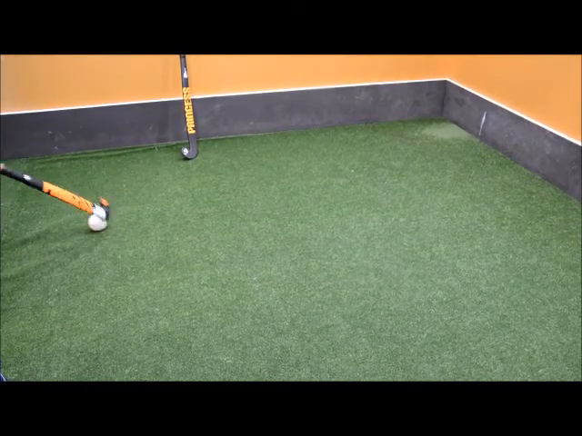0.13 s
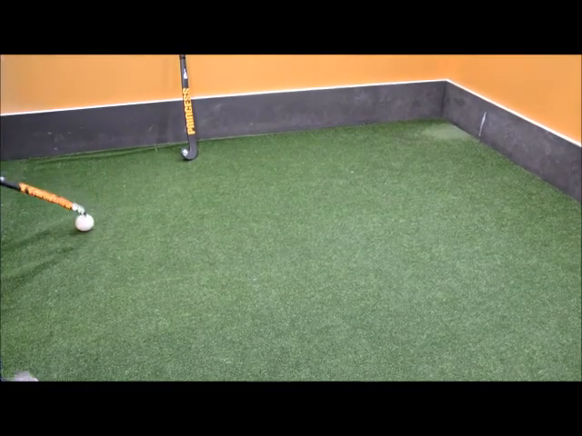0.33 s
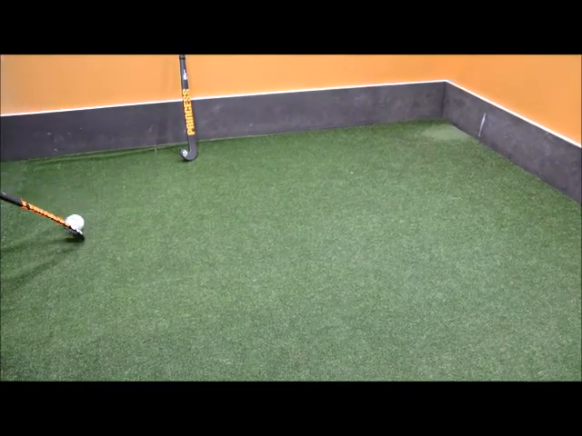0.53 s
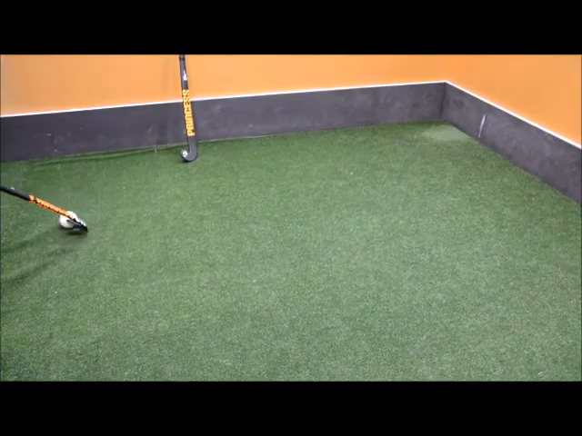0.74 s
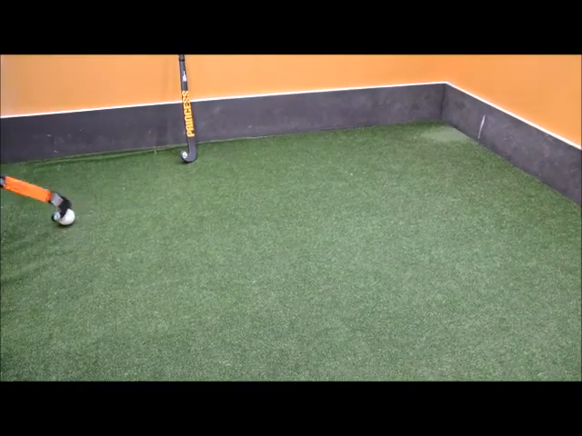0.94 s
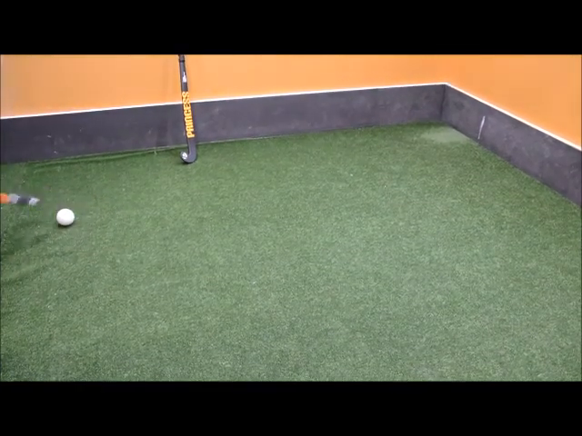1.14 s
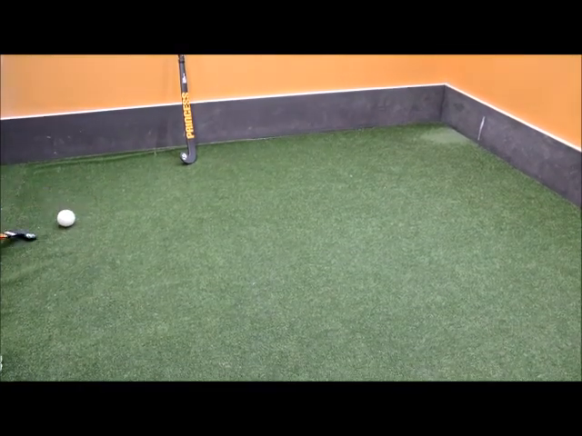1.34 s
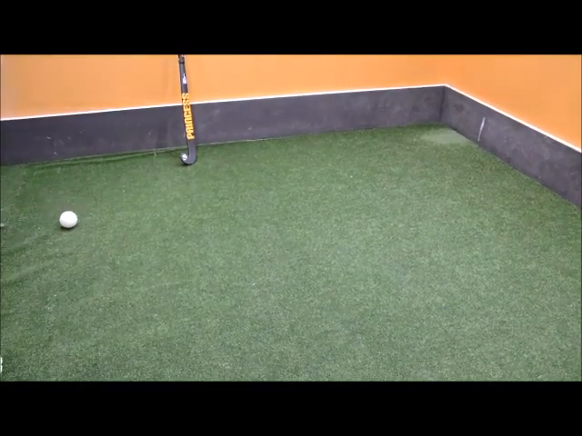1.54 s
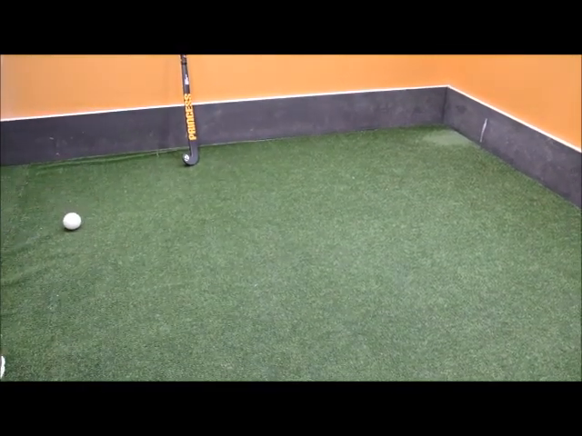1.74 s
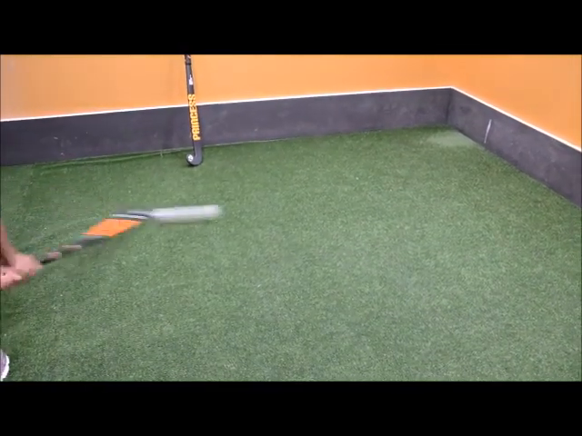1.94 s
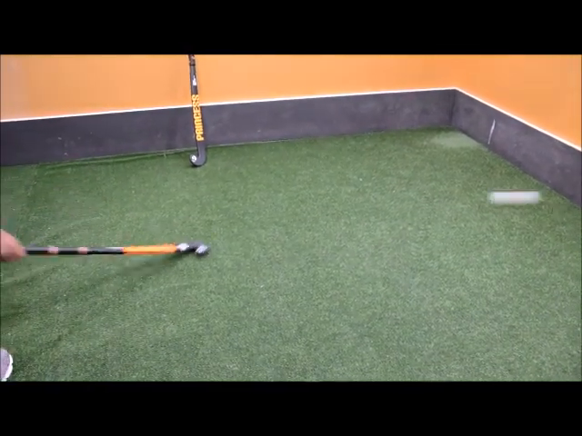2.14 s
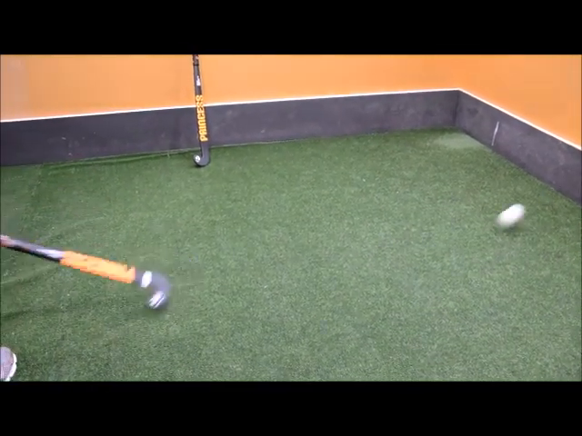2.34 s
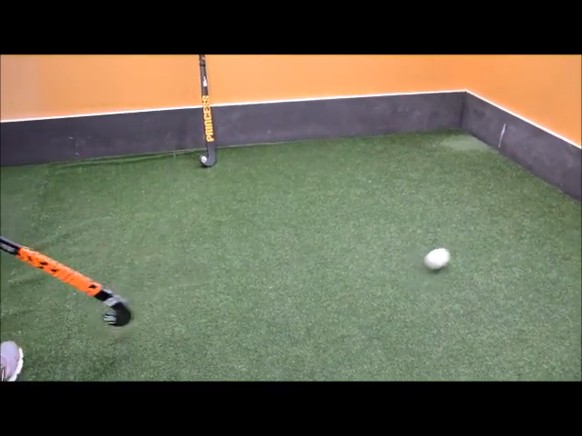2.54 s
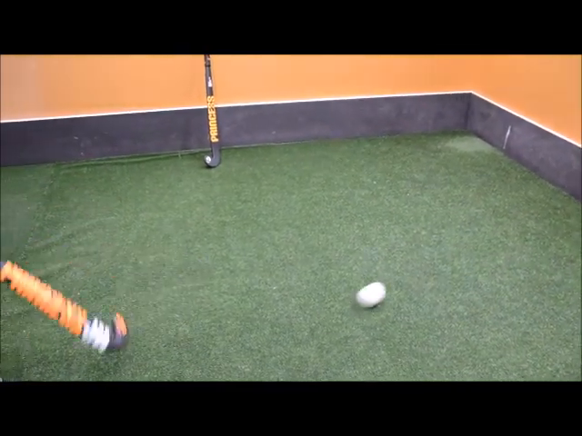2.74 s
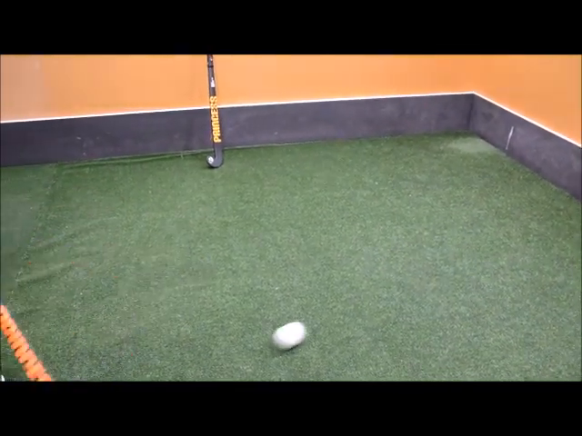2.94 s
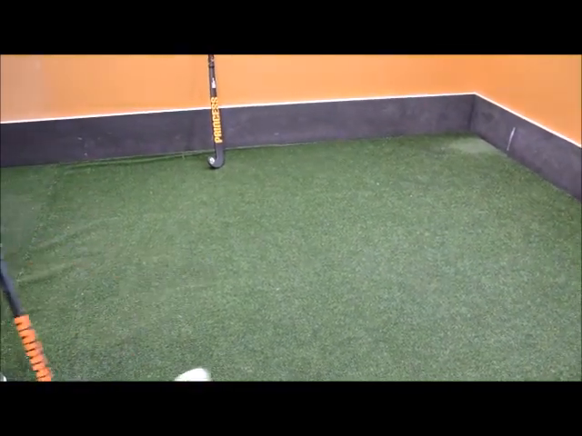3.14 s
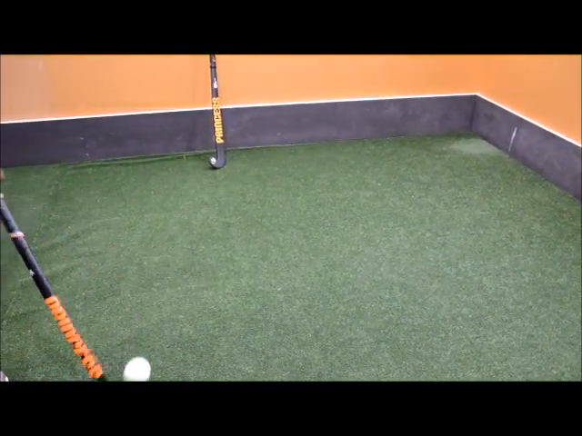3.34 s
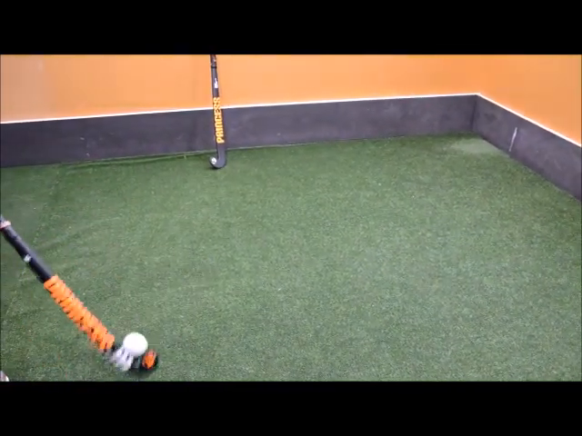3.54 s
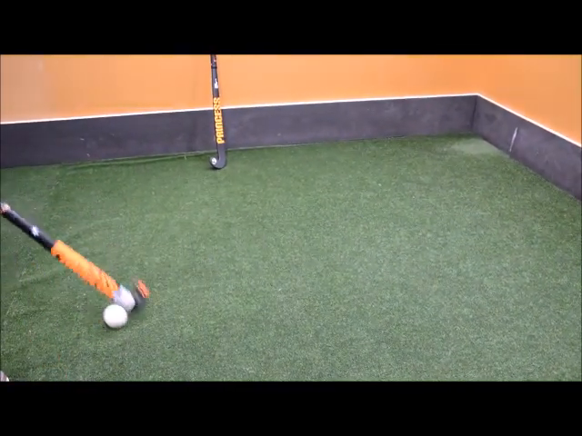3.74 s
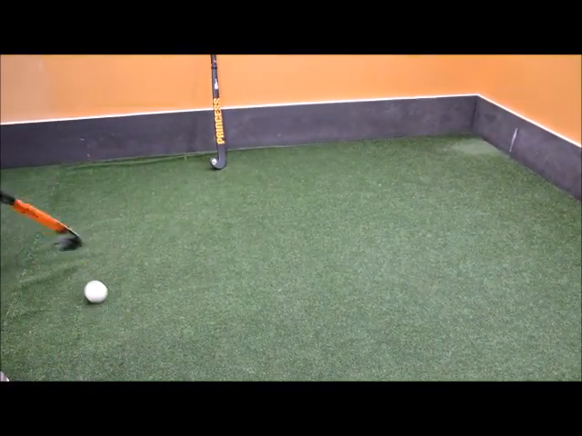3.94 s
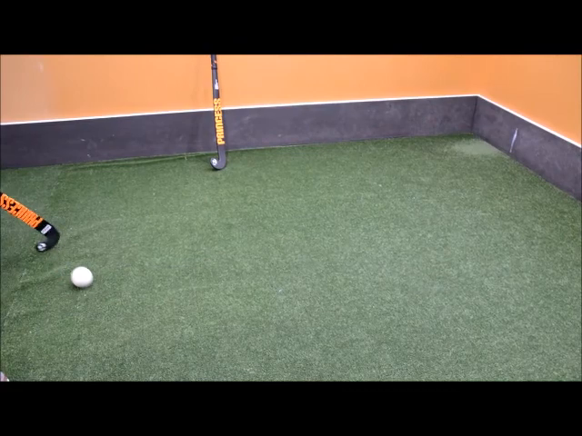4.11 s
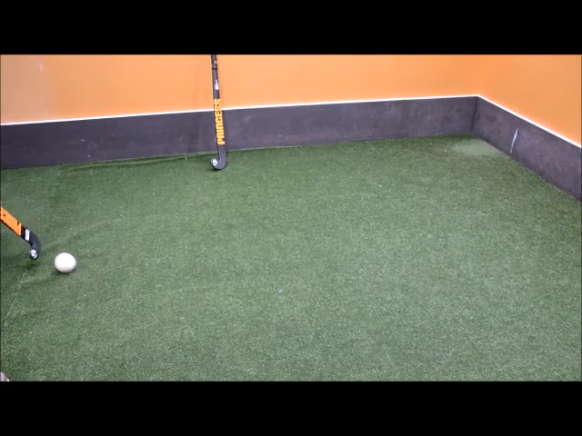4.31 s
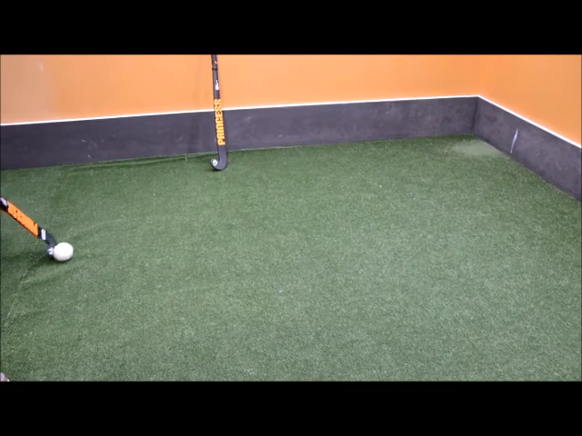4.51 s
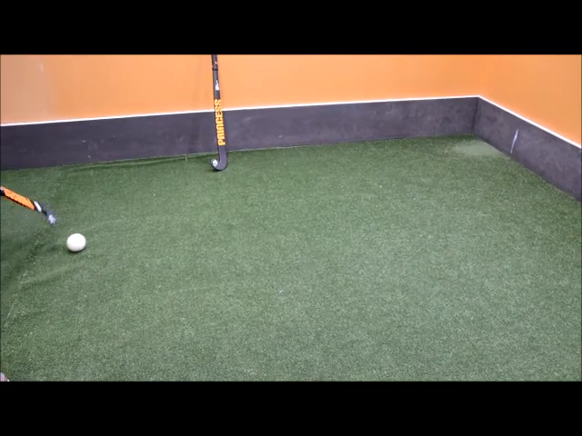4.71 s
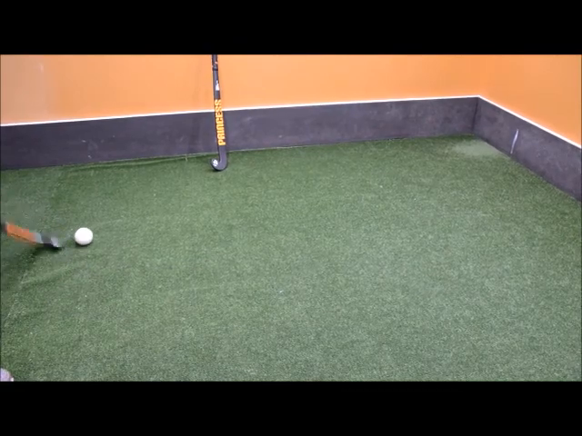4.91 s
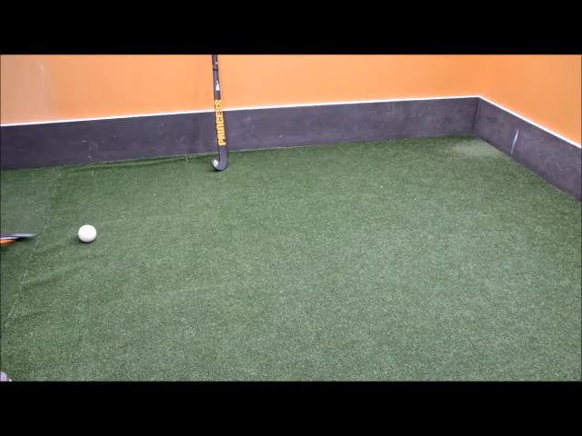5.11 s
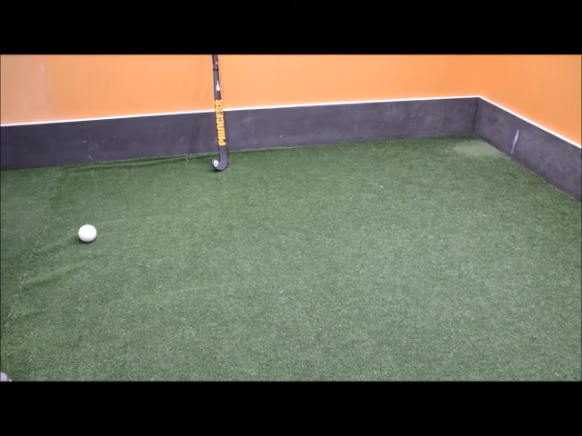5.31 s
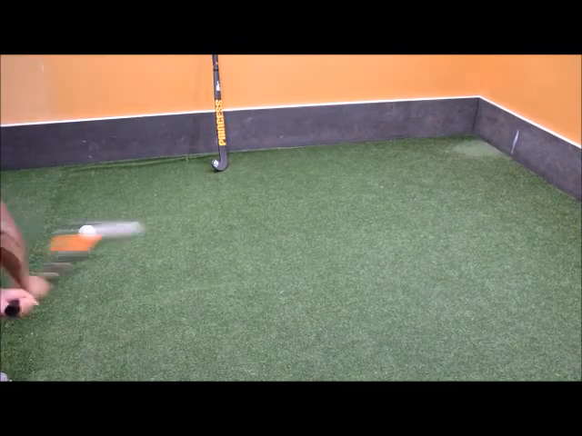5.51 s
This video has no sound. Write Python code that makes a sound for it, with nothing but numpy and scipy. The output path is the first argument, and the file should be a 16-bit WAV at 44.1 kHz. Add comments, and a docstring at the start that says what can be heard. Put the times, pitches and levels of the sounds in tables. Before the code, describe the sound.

A small, hard-walled indoor hall with a faint steady hum and a lively, short reverb. Very faint stick taps on a hard ball or turf come at 0.0 and 0.6 s, amid soft grainy brushing of plastic grass. A moderate, damped knock with a dull thud lands at 1.25 s, followed by light scuffing. At 1.9 s a strong, dry wooden crack sends the ball off; at 2.2 s it slaps a wooden side board, the loudest event, with a bright smack, short rattle and low boom that flatten the microphone input. Soft low footfalls or bounces follow at 2.5 and 2.7 s. At 3.25 s a hard, ringing double knock; a clicky lighter pair at 3.6 s. Faint taps come at 4.4, 4.7 and 4.9 s, with turf swishes until about 5.3 s. A final sharp, bright crack at 5.5 s echoes as it ends.

```python
"""A hockey stick and a hard ball on artificial turf in a small hard-walled hall, over a faint hum.
Faint to moderate stick taps lead to a strong knock at 1.9 s; each sums dying modes, a noisy clack and a tick.
At 2.2 s the shot slaps a wooden side board, which rattles and booms and overloads the input stage.
Hard knocks follow at 3.2 and 5.5 s, weaker ones between; grainy noise brushes the turf around them,
with low sine thuds and footfalls. Echoes and decaying random taps make the hall."""
import sys
import numpy as np
from scipy import signal
from scipy.fft import rfft, irfft
from scipy.io import wavfile
from scipy.ndimage import uniform_filter1d

SR = 44100
rng = np.random.default_rng(int(sys.argv[2]) if len(sys.argv) > 2 else 0)


def boost_factor(decibels):
    """Convert a level in decibels to a linear amplitude factor."""
    exponent = np.asarray(decibels, float) / 20
    return 10 ** exponent


def transcribe(signal):
    """Save signal, clipped to [-1, 1], as a 16-bit WAV file at the path in sys.argv[1]."""
    frames = np.atleast_2d(signal).T
    limited = np.clip(frames, -1, 1)
    pcm = np.round(limited * 32767).astype(np.int16)
    wavfile.write(sys.argv[1], SR, pcm)


N = 245195

# stick ring colours: pitch_hz (before detuning), level_db (relative), t60_s (before grip damping)
HOOK_MODES = [(1340, -1, .045), (1520, -2, .015), (1730, 0, .09)]
SHAFT_MODES = [(520, -4, .02), (620, -3, .025), (750, 0, .045)]
BLADE_MODES = [(890, -6, .03), (1030, -5, .015), (1135, -4, .06), (1205, 0, .11)]
TOE_MODES = [(1965, 0, .06), (2180, -4, .025), (2800, -6, .025), (4280, -8, .015)]
# centres of hook, shaft, blade, toe: place (about 0-1, runs through these ring colours)
COLOUR_PLACES = [0.001, .4, .75, 1.101]
# trim of hook, shaft, blade, toe: level_db
COLOUR_DB = [0., 0.5, 0., -2.5]
# countless short modes of ball and toe: freq_hz, level_db (per Hz, relative)
CLACK_SPECTRUM = [(500, -17), (1000, 6), (2000, -4), (3500, -6), (5500, -16), (9000, -20), (16000, -23)]
# stick on ball or turf: start_s, level_db, place (as COLOUR_PLACES), ring_share (left by grip), tick_db (re knock)
KNOCKS = [(0.0034, -46, 0.28, 1, -9), (0.5915, -41.5, .45, 0.95, -9), (1.2411, -28.5, 0.62, 0.17, -21),
          (1.874, -12, 0.39, 0.13, -11.5), (3.2464, -11.5, 0, 0.88, -15), (3.2556, -20.5, 0.98, 0.71, -18),
          (3.6218, -27, 0.43, 0.24, 3), (3.632, -34, .1, 0.97, -5), (4.4059, -35, 0.62, 0.83, -10.5),
          (4.6992, -34.5, 0.99, 0.84, -25), (4.711, -31.5, 1.1, .5, -25), (4.899, -37.5, .55, 0.12, -17),
          (5.4855, -10.5, 0.3, 0.14, -6)]
STICK_HZ = 340  # a thin stick hardly radiates below this
REACH_DB = -42  # loss of a ring colour per squared distance in place
CONTACT_S, SOFTENING = 0.0004, -0.11  # rise at -12 dB; dB of rise time per dB of force
CLACK_DB, CLACK_REACH_DB, CLACK_PER_TICK = 4, -9, 0.085  # re knock; per squared distance from toe; dB per tick dB
CLACK_KNEE_HZ, BRIGHTENING = 8450, 0.16  # low-pass at -31 dB; dB of frequency per dB of force
CLACK_RISE_S, TICK_LAG_S = 0.00051, 0.0009  # clack builds; tick comes at full compression of ball and wood


def stick():
    """One stick rings at every knock; place mixes its ring colours, gentle knocks rise slower."""
    out = np.zeros(N)
    colours = (HOOK_MODES, SHAFT_MODES, BLADE_MODES, TOE_MODES)
    for start_s, level_db, place, ring_share, tick_db in KNOCKS:
        distance_sq = (place - np.array(COLOUR_PLACES)) ** 2
        rise_s = CONTACT_S * boost_factor(SOFTENING * (level_db + 12))
        colour_levels_db = level_db + np.array(COLOUR_DB) + REACH_DB * distance_sq
        for modes, colour_db in zip(colours, colour_levels_db):
            add(out, start_s, boost_factor(colour_db) * ring(modes, abs(ring_share), rise_s=rise_s))

        knee_hz = min(CLACK_KNEE_HZ * boost_factor(BRIGHTENING * (level_db + 31)), 18000)
        lowpass = signal.butter(2, knee_hz, fs=SR, output="sos")
        clack = signal.sosfilt(lowpass, burst(CLACK_SPECTRUM, 0.024, CLACK_RISE_S))
        clack_db = level_db + CLACK_DB + CLACK_REACH_DB * distance_sq[-1] + CLACK_PER_TICK * tick_db
        add(out, start_s, boost_factor(clack_db) * clack)
        add(out, start_s + TICK_LAG_S, tick(level_db + tick_db))
    return signal.sosfilt(signal.butter(3, STICK_HZ, "high", fs=SR, output="sos"), out)


# contact click: freq_hz, level_db (per Hz, relative)
TICK_SPECTRUM = [(1500, -32.5), (4000, -0.5), (5500, 3), (7000, -1), (10000, -9), (16000, -17.5)]
TICK_KNEE_HZ = 7000  # force changes the colour above this


def tick(level_db):
    """Hard contact: one causal minimum-phase click, peak at level_db."""
    hz = abs(np.fft.fftfreq(1024, 1 / SR))
    log_gain = np.log(boost_factor(read(harden(TICK_SPECTRUM, level_db, TICK_KNEE_HZ), hz)))
    click = np.fft.ifft(np.exp(np.conj(signal.hilbert(log_gain)))).real[:512]
    return boost_factor(level_db) * click / abs(click).max()


HARDENING = 0.1  # dB per octave above the knee, per dB of force


def harden(spectrum, force_db, knee_hz):
    """Harder contacts are shorter, so they reach higher; neutral at -21.5 dB."""
    tilt_db = HARDENING * (force_db + 21.5)
    return [(hz, level_db + tilt_db * max(np.log2(hz / knee_hz), 0)) for hz, level_db in spectrum]


# panel modes: pitch_hz (before detuning), level_db (relative), t60_s
BOARD_MODES = [(75, -22, .15), (100, -7, .1), (140, -8, .06), (180, -6, .05), (226, -4, .06),
               (278, -5, .04), (336, 0, .07), (378, -1, .06), (522, -8, .04), (603, -8, .035),
               (669, -6, .04)]
# loose panel and fixings: freq_hz, level_db (per Hz, relative)
RATTLE_SPECTRUM = [(50, -36), (90, -4), (200, 2.5), (330, 8.5), (520, 1), (800, 0), (1400, -4), (2200, -13),
                   (3800, -20.5), (5500, -36.5), (9000, -51), (16000, -46)]
SHOT_S = 2.1729
SHOT_DB, SLAP_DB, RATTLE_DB = -3, -3, 0


def board():
    """Bright slap of ball on wood, then the panel rattles (noise) and booms (modes)."""
    out = np.zeros(N)
    add(out, SHOT_S, tick(SLAP_DB))
    add(out, SHOT_S + 0.00054, boost_factor(RATTLE_DB) * burst(RATTLE_SPECTRUM, 0.051, 0.00065))
    add(out, SHOT_S + 0.00078, boost_factor(SHOT_DB) * ring(BOARD_MODES, rise_s=0.0075))
    return out


# turf and floor modes: pitch_hz (before detuning), level_db (relative), t60_s
THUD_MODES = [(143, -16, .05), (212, -0.5, 0.024), (364, 5.5, 0.017)]
# thuds under some knocks: start_s, level_db
THUDS = [(0.588, -49.5), (1.242, -31), (1.873, -36), (3.245, -30), (3.619, -30), (4.404, -45.5),
         (4.663, -45.5), (4.896, -38), (5.484, -41.5)]


def thuds():
    """Dull knocks through turf and floor: short low modes, detuned at each blow."""
    out = np.zeros(N)
    for start_s, level_db in THUDS:
        add(out, start_s, boost_factor(level_db) * ring(THUD_MODES, spread=0.074, rise_s=0.002))
    return out


# soft footfalls and ball bounces on turf: start_s, level_db, pitch_hz
STEPS = [(0.658, -66, 199.6), (1.169, -55, 76.6), (2.501, -28, 90), (2.698, -35, 79), (3.414, -35, 107),
         (4.661, -47, 96.3), (4.928, -42, 177), (5.379, -48.5, 90.8)]


def steps():
    """Low soft pushes of a few cycles: damped sines."""
    out, t = np.zeros(N), np.arange(SR // 4) / SR
    rise = 1 - np.exp(-t / 0.0058)
    for start_s, level_db, pitch_hz in STEPS:
        fall = boost_factor(level_db - 60 * t / 0.066)
        add(out, start_s, fall * np.sin(2 * np.pi * pitch_hz * t) * rise)
    return out


# bright brushing: freq_hz, level_db (per Hz, relative)
FIBRE_SPECTRUM = [(120, -47.5), (200, 2.5), (353, -24.5), (394, -11), (424, -32), (465, -26), (709, -27.5),
                  (933, -11), (1680, 0.5), (3830, 2), (16000, -22.5)]
# dull dragging: freq_hz, level_db (per Hz, relative)
DRAG_SPECTRUM = [(120, -57.5), (200, -23.5), (601, -25.5), (763, -4), (1910, -4), (2330, -6),
                 (14100, -30.5), (16000, -46.5)]
# soles, stick and ball over turf: start_s, length_s (before release), level_db, dullness (0-1)
STROKES = [(0.0, 0.02, -54, 0.16), (0.085, 0.072, -58.5, .45), (0.491, 0.055, -53, 0.68),
           (0.567, 0.09, -52.5, 0.74), (0.865, 0.024, -57, 0.46), (1.032, 0.34, -66, .5),
           (1.238, .1, -52.5, .7), (1.366, 0.18, -55.5, 0), (1.514, .26, -52.5, .4), (1.805, 0.1, -51, 1),
           (2.534, 0.084, -54.5, 0.37), (2.666, 0.034, -45.5, 0.29), (3.024, .17, -68.5, .3),
           (4.645, 0.16, -56.5, 0.35), (4.88, 0.042, -43.5, 0.2), (4.939, .13, -53.5, .3),
           (5.07, 0.2, -50, 0.27), (5.383, 0.036, -54.5, .05), (5.438, 0.042, -44.5, 0.47)]
STROKE_RISE_S, STROKE_FADE_DB, STROKE_RELEASE_S = 0.015, -4.5, 0.023  # quick bite, slowing drag, lift-off


def brush():
    """Plastic fibres flick back: grainy noise, duller when something heavy drags."""
    t, hz = np.arange(N) / SR, np.fft.rfftfreq(512, 1 / SR)
    grain_db = 0.83 * np.minimum(rng.exponential(1, N // 64 + 1), 5)
    grains = boost_factor(grain_db).repeat(64)[:N]
    bright = evened(noise(boost_factor(read(FIBRE_SPECTRUM, hz))[:, None]) * grains)
    dull = evened(noise(boost_factor(read(DRAG_SPECTRUM, hz))[:, None]) * grains)
    out = np.zeros(N)
    for start_s, length_s, level_db, dullness in STROKES:
        since_s = np.maximum(t - start_s, 0)
        share = np.clip(dullness, 0, 1)
        bite = np.minimum(since_s / STROKE_RISE_S, 1)
        release = np.exp(-np.maximum(since_s - length_s, 0) / STROKE_RELEASE_S)
        drag = boost_factor(level_db + STROKE_FADE_DB * since_s / length_s)
        out += bite * release * drag * ((1 - share) * bright + share * boost_factor(4.5) * dull)
    return out


# steady hall noise: freq_hz, level_db (per Hz, relative)
HUM_SPECTRUM = [(12, -33), (20, -34), (86, -3.5), (251, -7), (382, -7), (492, -8.5), (551, -3), (634, -12),
                (1240, -4), (1690, -13), (2730, -16.5), (3620, -17.5), (5360, -23), (15200, -37.5),
                (16500, -50)]
# floor under the turf as weight lands: start_s, level_db, t60_s
RUMBLES = [(0.3, -77, 0.54), (0.62, -72, 1.7), (1.23, -41.5, 0.47), (2.3, -40.5, 1.86), (3.41, -51, 0.24),
           (3.55, -57, 0.64), (4.04, -62.5, 1.8), (4.65, -68.5, 0.83), (4.9, -48.5, 0.52),
           (5.379, -62, 0.44)]
HUM_DB, RUMBLE_FLOOR_DB, RUMBLE_RISE_S = -57.5, -80.5, 0.0069


def hum():
    """Steady hall noise with slow patches, and a low rumble that swells under each load."""
    hz, t = np.fft.rfftfreq(N, 1 / SR), np.arange(N) / SR
    patches = uniform_filter1d(rng.standard_normal((N // 128 + 5, 257)), 20, 0)
    patches = evened(uniform_filter1d(patches, 6, 1)).T
    air = irfft(rfft(noise(boost_factor(1.5 * patches))) * boost_factor(read(HUM_SPECTRUM, hz)), N)
    low = irfft(rfft(rng.standard_normal(N)) / (1 + ((hz - 82) / 22) ** 4), N)
    load = boost_factor(RUMBLE_FLOOR_DB)
    for start_s, level_db, t60_s in RUMBLES:
        rise = np.clip((t - start_s) / RUMBLE_RISE_S, 0, 1)
        load = load + rise * boost_factor(level_db - 60 * np.maximum(t - start_s, 0) / t60_s)
    return boost_factor(HUM_DB) * evened(air) + load * evened(low)


# wall absorption: freq_hz, t60_s, return_db (relative)
WALLS = [(81, 0.3, 0), (247, 0.52, 2), (681, 0.75, 1.5), (1430, 0.55, 0), (3094, 0.52, 0), (5850, 0.57, -2),
         (11740, 0.45, -3.5), (16000, 0.54, -5)]
# nearest walls: delay_s (before 4 % jitter), level_db
ECHOES = [(.0048, -12), (.0095, -7), (0.0143, -9.5), (.021, -12.5), (.030, -22.5)]
HALL_DB, BUILD_S = 0.5, 0.011  # diffuse tail over direct sound; time constant of its build-up


def hall(x):
    """Wall echoes, then sparse taps dying by band; three tails cycle slowly, so knocks echo differently."""
    taps, walls = np.zeros((3, SR)), np.array(WALLS)
    slots = np.arange(100, SR - 20, 16)
    at = slots + rng.integers(0, 16, (3, len(slots)))
    np.put_along_axis(taps, at, rng.choice([-1., 1.], at.shape), 1)

    hz, t, z = signal.stft(taps, SR, nperseg=512)
    return_db = read(walls[:, ::2], hz)[:, None]
    t60_s = read(walls[:, :2], hz)[:, None]
    tails = signal.istft(z * boost_factor(return_db - 60 * t / t60_s), SR, nperseg=512)[1][:, :SR]
    tails *= (1 - np.exp(-np.arange(SR) / SR / BUILD_S)) * (np.arange(SR) > 100)
    tails *= boost_factor(HALL_DB) / np.linalg.norm(tails, axis=1, keepdims=True)
    for delay_s, level_db in ECHOES:
        delays = np.round(delay_s * SR * rng.uniform(0.96, 1.04, 3)).astype(int)
        tails[range(3), delays] += boost_factor(level_db)

    # 1.7 s cycle, three phases; summed power stays constant
    turn = np.arange(N) / SR * 2 * np.pi / 1.7 + np.arange(3)[:, None] * 2 * np.pi / 3
    sends = x * np.cos(turn) * np.sqrt(2 / 3)
    return x + signal.fftconvolve(sends, tails, axes=1)[:, :N].sum(0)


def ring(modes, damping=1., spread=0.005, rise_s=0.0003):
    """Struck solid: dying sines, a little detuned at every blow, peak 1."""
    t = np.arange(SR // 5)[:, None] / SR
    hz, level_db, t60_s = np.transpose(modes)
    hz = hz * (1 + spread * rng.standard_normal(len(hz)))
    sign = (-1) ** np.arange(len(hz))
    fall = boost_factor(level_db - 60 * t / (damping * t60_s))
    out = (sign * fall * np.sin(2 * np.pi * hz * t)).sum(1)
    out *= 1 - np.exp(-t[:, 0] / rise_s)
    return out / abs(out).max()


def burst(spectrum, t60_s, rise_s):
    """Dense modes as dying noise; spectrum and envelope imposed in turn so both stay smooth."""
    hz, t = np.fft.rfftfreq(4096, 1 / SR), np.arange(4096) / SR
    envelope = boost_factor(-60 * t / t60_s) * (1 - np.exp(-(t / rise_s) ** 2))
    window = 1 + int(t60_s * SR / 4)
    x = rng.standard_normal(4096) * envelope
    for _ in range(6):
        z = rfft(x)
        x = irfft(boost_factor(read(spectrum, hz)) * z / (abs(z) + 1e-30))
        power = abs(uniform_filter1d(x ** 2, size=window, mode="wrap"))
        x *= envelope / np.sqrt(power + 1e-30)
    return x


def noise(gain):
    """Random short-time spectra (512-sample frames) under a gain of bins x frames."""
    z = rng.standard_normal((N // 128 + 5, 257, 2)) @ [1, 1j]
    return signal.istft(z.T * gain, nperseg=512, noverlap=384)[1][:N]


def evened(x):
    """Scales to rms 1."""
    return x / np.sqrt(np.mean(x ** 2) + 1e-20)


def read(points, hz):
    """Interpolates (hz, value) points over log frequency."""
    f, value = np.transpose(points)
    return np.interp(np.log(hz + 1), np.log(f + 1), value)


def add(mix, start_s, sound):
    """Adds a sound at start_s, cut at the end of the mix."""
    part = mix[round(start_s * SR):][:len(sound)]
    part += sound[:len(part)]


def scene():
    """Every source on the floor excites the hall; the hum is added dry."""
    return (hall(stick() + thuds() + board() + steps() + brush()) + hum())[None]


def top_cut(x):
    """Nothing passes above the cut-off."""
    return signal.sosfilt(signal.butter(12, 16780, fs=SR, output="sos"), x)


MIC_HZ = 60.7  # bass roll-off
PORT_HZ, PORT_Q, PORT_GAIN = 3700, 4.6, 0.67  # resonance of the microphone port
OVERLOAD = 0.97  # ceiling of the input stage


def record(dry):
    """Microphone drops deep bass, its port lifts presence; the input stage flattens peaks, hard knee."""
    x = signal.sosfilt(signal.butter(3, MIC_HZ, "high", fs=SR, output="sos"), dry)
    x = x + PORT_GAIN * signal.lfilter(*signal.iirpeak(PORT_HZ, PORT_Q, SR), x)
    clipped = x / (1 + abs(x / OVERLOAD) ** 12) ** (1 / 12)
    return top_cut(clipped)


dry = scene()
out = record(dry)
transcribe(out)
```